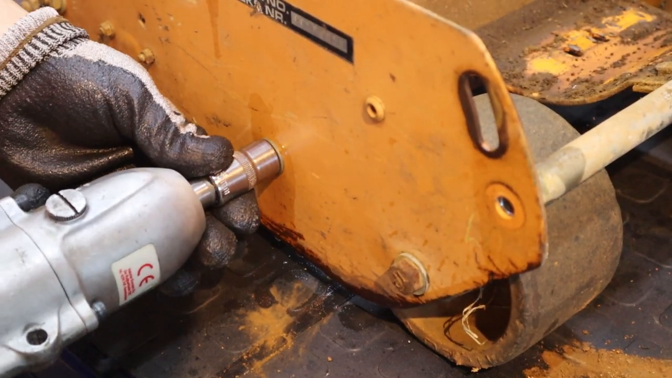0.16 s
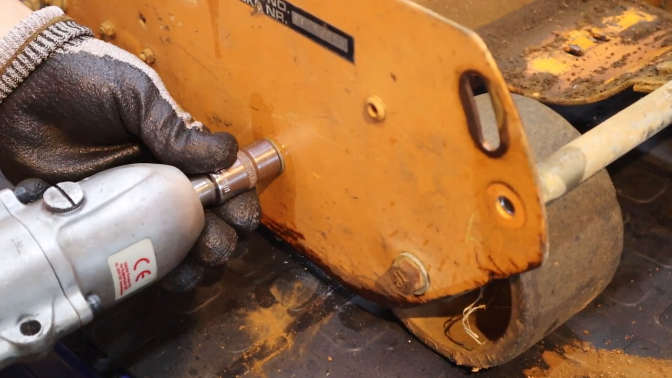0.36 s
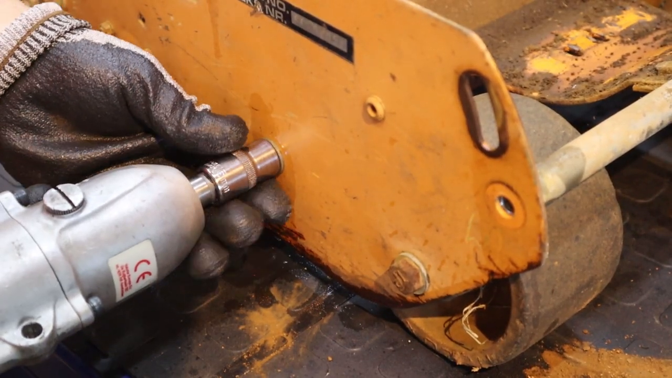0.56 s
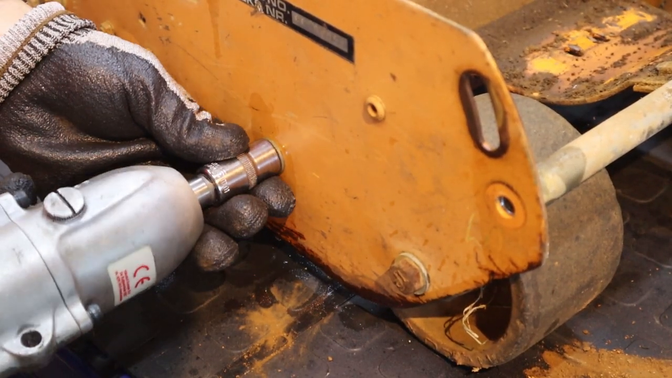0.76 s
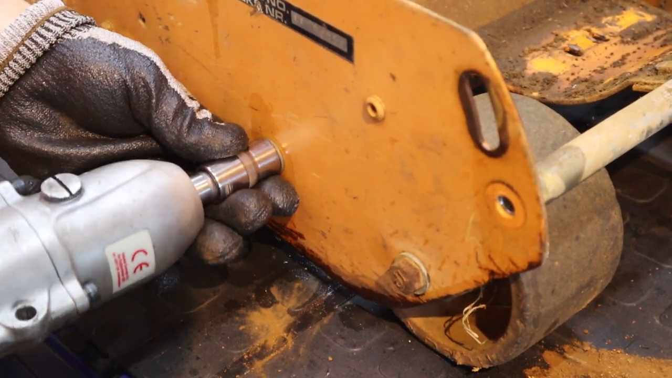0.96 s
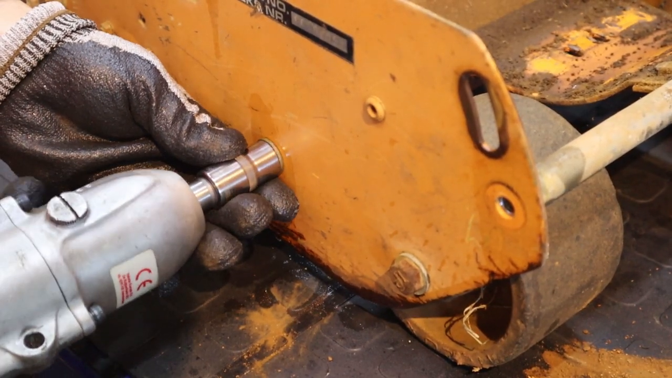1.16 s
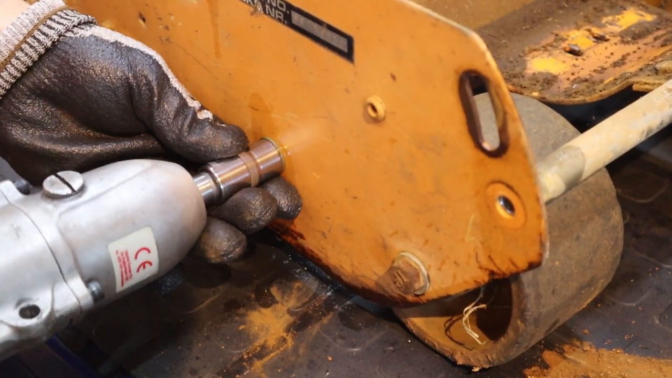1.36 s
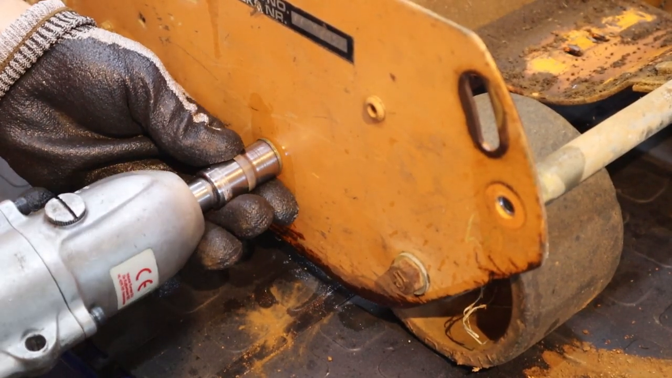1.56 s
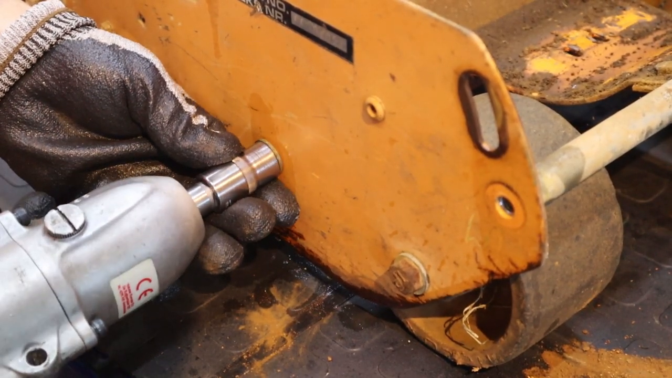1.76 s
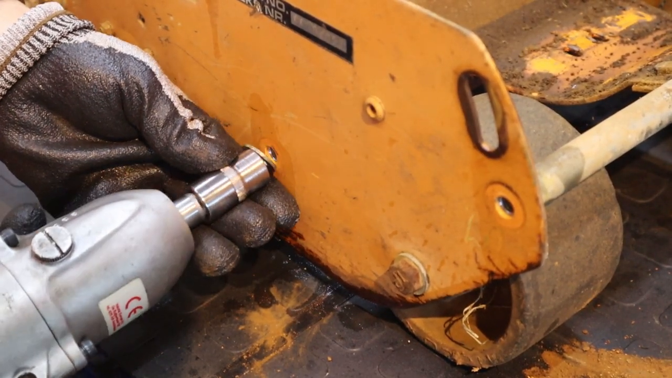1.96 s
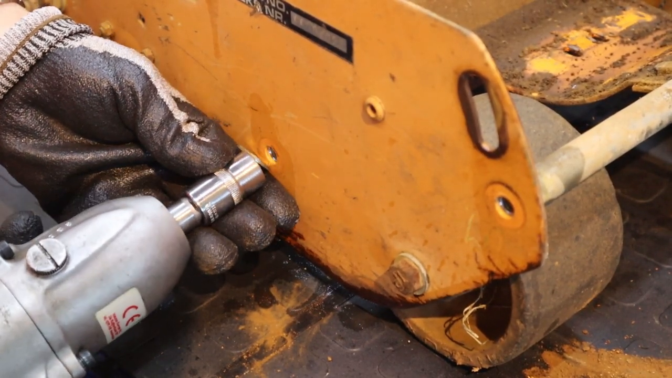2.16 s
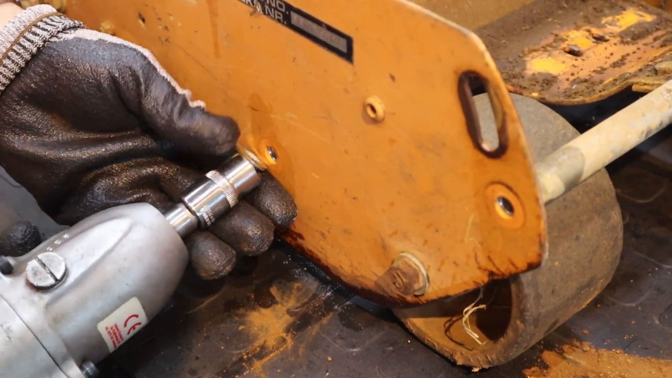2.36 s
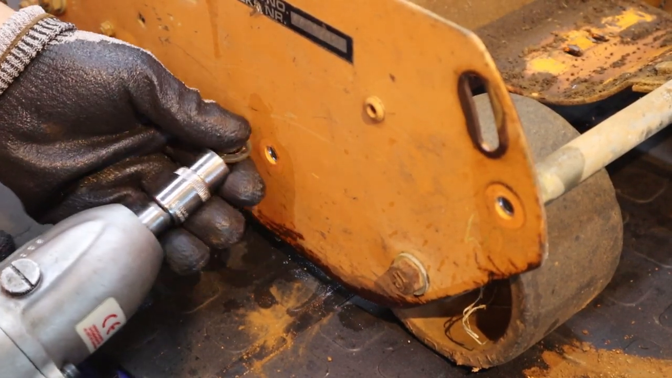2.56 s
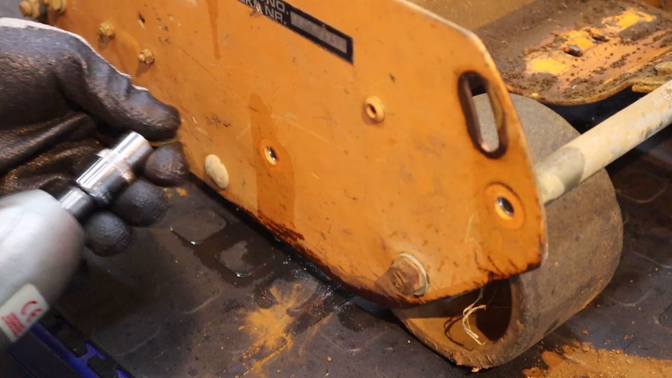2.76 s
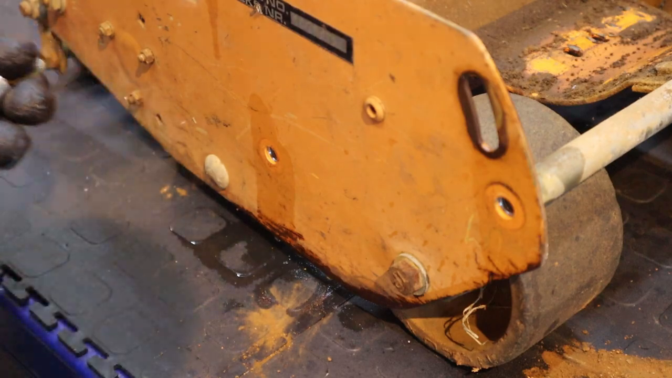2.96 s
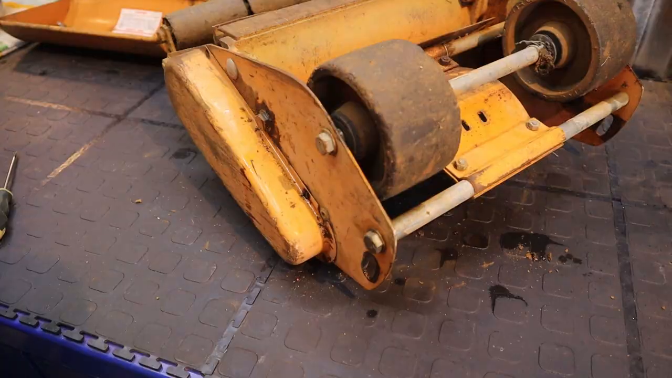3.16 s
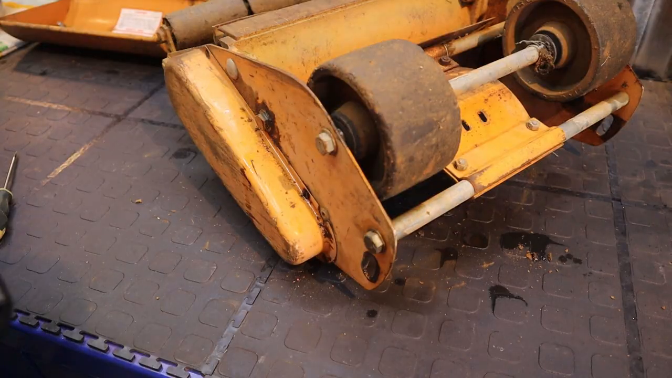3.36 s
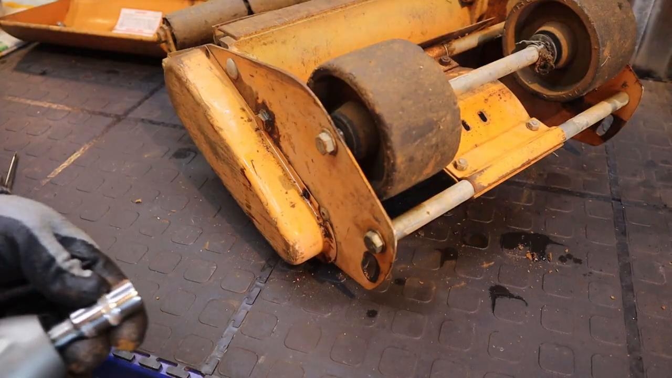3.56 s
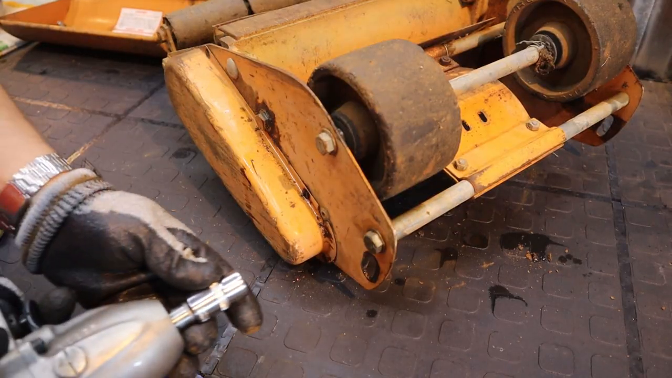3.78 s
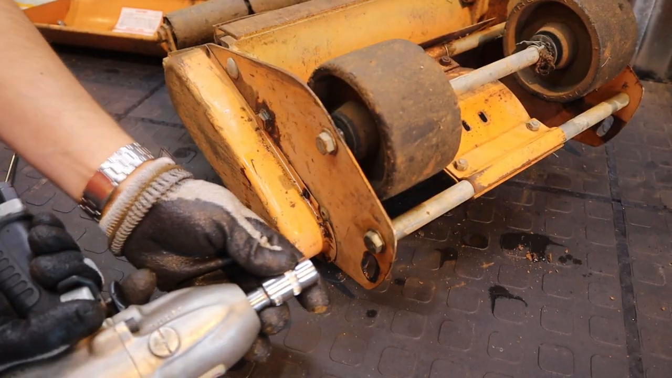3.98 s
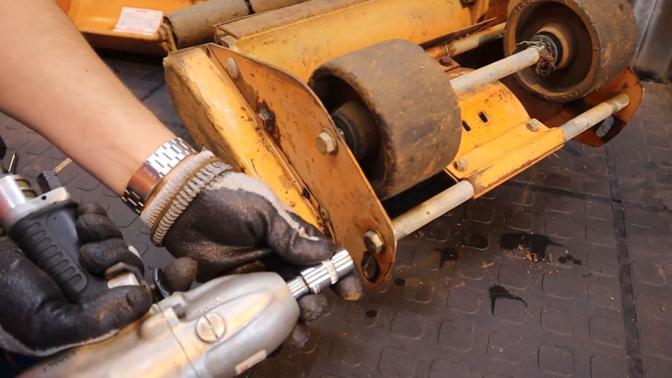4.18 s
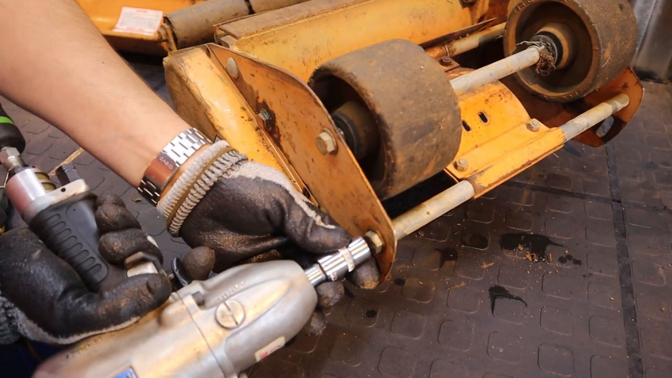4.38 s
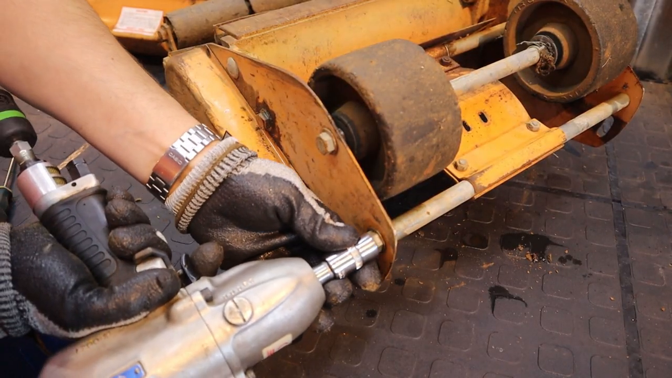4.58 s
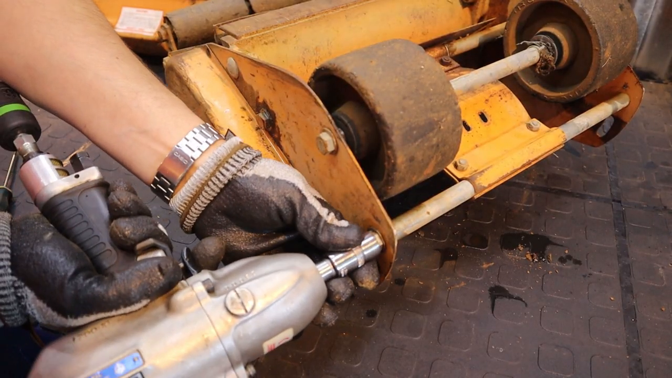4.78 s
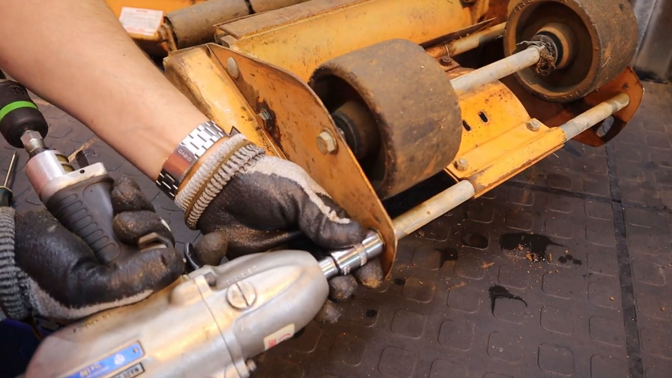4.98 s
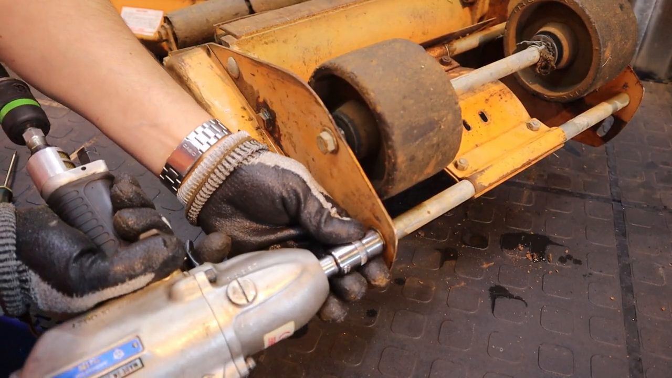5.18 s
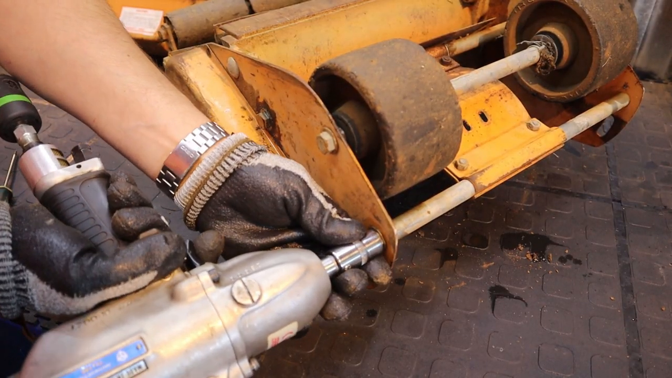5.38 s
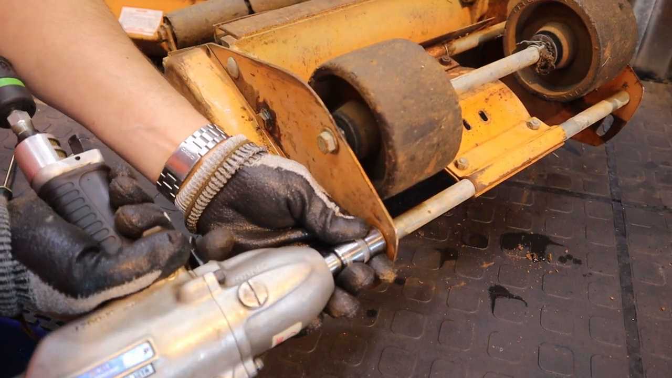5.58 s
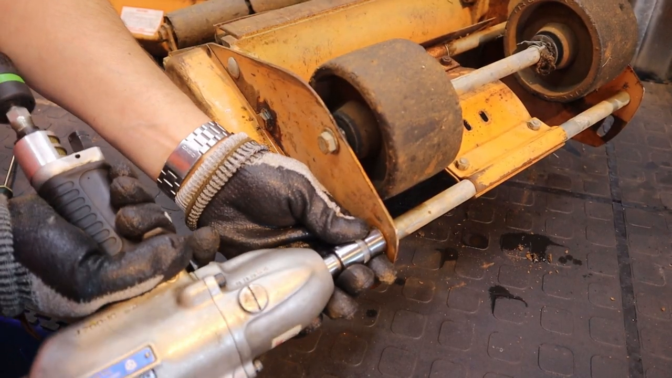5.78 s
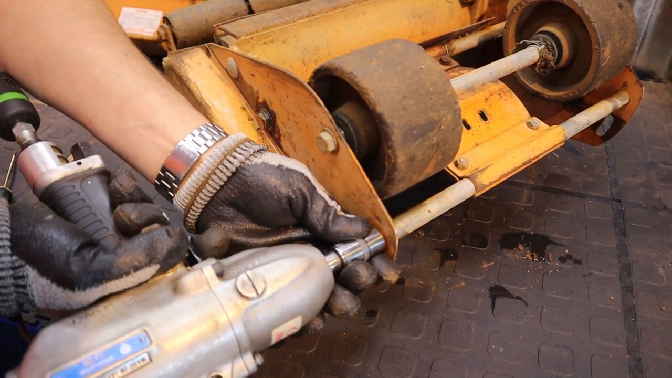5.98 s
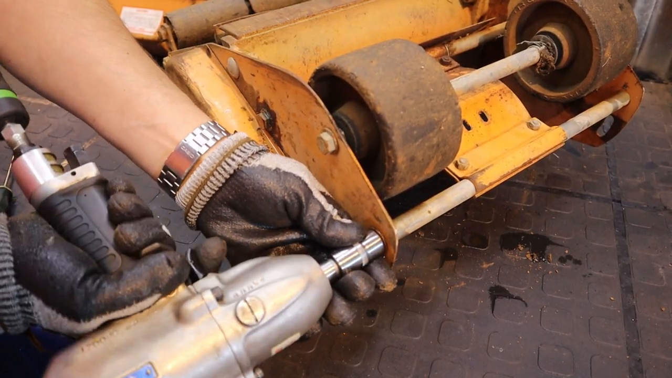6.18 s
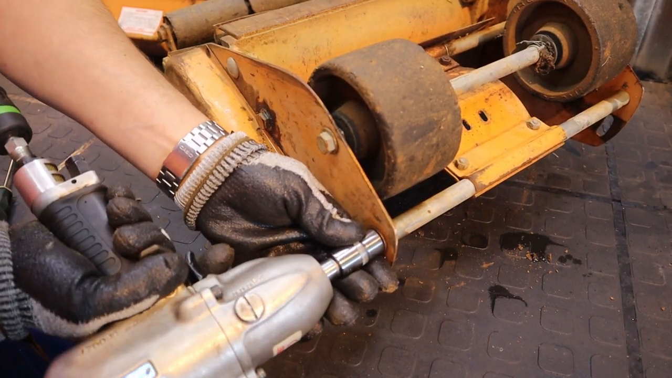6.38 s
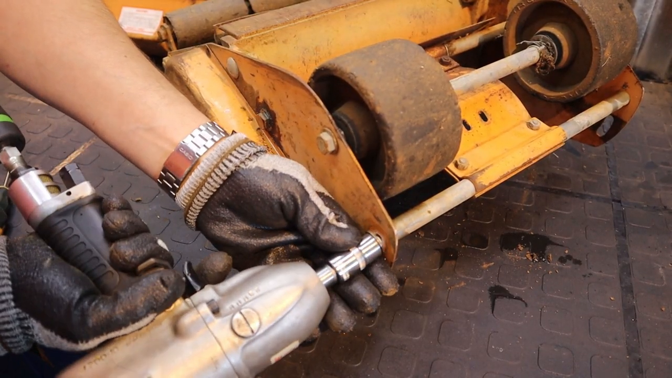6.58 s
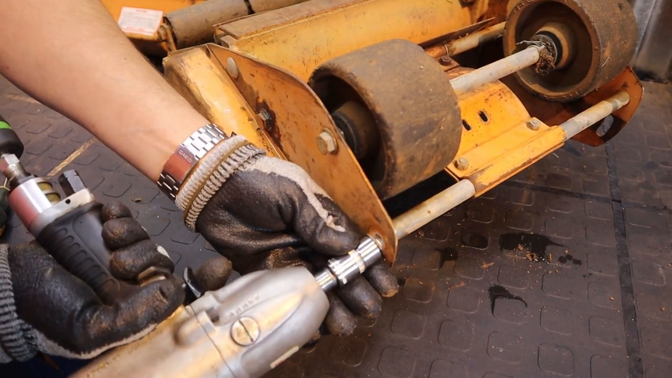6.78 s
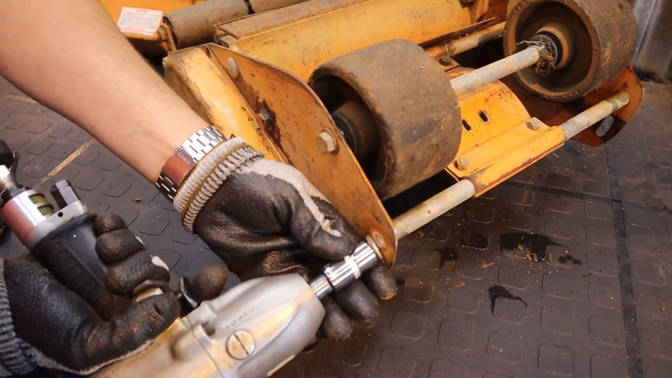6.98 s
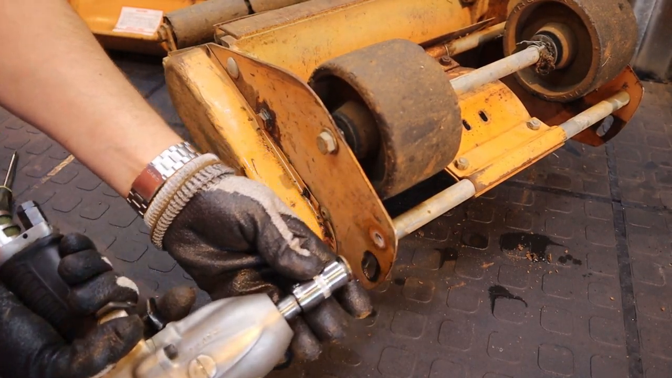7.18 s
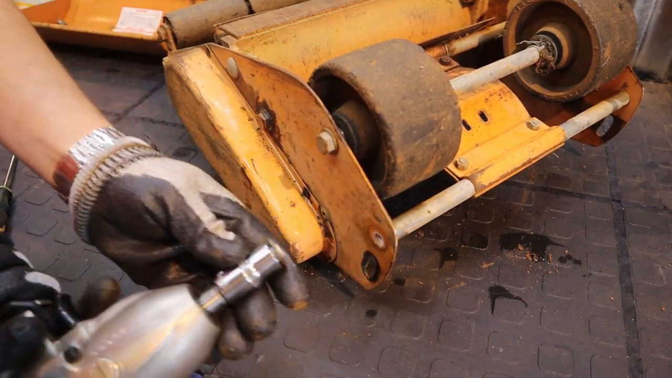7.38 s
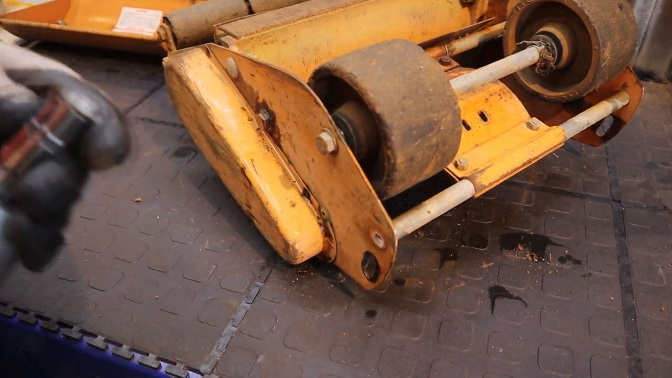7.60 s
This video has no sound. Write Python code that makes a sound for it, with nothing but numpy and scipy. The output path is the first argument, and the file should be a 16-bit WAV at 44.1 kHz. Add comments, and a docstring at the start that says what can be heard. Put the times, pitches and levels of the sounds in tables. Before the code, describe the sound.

Near, dry tool sounds with a short wall echo: metal clinks, a loud clattering burst of a pneumatic wrench, a smooth spinning burst, then loose socket rattles. After a near-silent gap the low room noise jumps to a different hum and small gliding bird notes are heard. A heavy dull knock seats the tool, then three brief hissing pulls with sharp steel blows wind down into faint hum.

```python
"""Air impact wrench in a workshop

An air wrench works in short pulls on bolts in a steel plate; a mains hum and rough noise lie behind it. Its
motor is a whine tied to the turning speed, with hiss and roar shaped from noise and ringing casing parts.
Hammer blows and socket clinks are noise cracks with ringing steel; dull knocks are low tones with a puff. At
3.13 s the scene changes, and another set of hum tones is heard; between the two jobs a bird sings outside in
gliding notes; a wall echo and the room's ring are added."""
import sys
import numpy as np
from scipy import signal
from scipy.fft import rfft, irfft
from scipy.io import wavfile
from scipy.ndimage import uniform_filter1d

SR = 44100
rng = np.random.default_rng(int(sys.argv[2]) if len(sys.argv) > 2 else 0)


def waveform_to_disk(signal):
    """Save audio, clipped to [-1, 1], as 16-bit WAV at the path in sys.argv[1]."""
    frames = np.transpose(np.atleast_2d(signal))
    scaled = np.clip(frames, -1, 1) * 32767
    samples = np.round(scaled).astype(np.int16)
    wavfile.write(sys.argv[1], SR, samples)


N = 336924  # length in samples


def gain_of(db):
    """Turns decibels into amplitude."""
    return 10 ** (np.asarray(db) / 20)


def evened(x):
    """Scales a sound to an rms of 1."""
    return x / np.sqrt(np.mean(x ** 2) + 1e-20)


def read(points, hz):
    """Reads a curve between its points, with frequency on a log axis."""
    f, value = np.transpose(points)
    return np.interp(np.log(hz + 1), np.log(f + 1), value)


def add(mix, s, sound):
    """Mixes a sound in at time s, in seconds."""
    part = mix[round(s * SR):][:len(sound)]
    part += sound[:len(part)]


def coloured(x, points):
    """Filters a sound by a curve of (f/Hz, level/dB) points."""
    hz = np.fft.rfftfreq(len(x), 1 / SR)
    return irfft(rfft(x) * gain_of(read(points, hz)), len(x))


def resonate(x, hz, width):
    """Rings at hz, with a gain of 1 at the peak: shift down to 0 Hz, smooth, shift back up."""
    turn = np.exp(2j * np.pi * np.cumsum(hz * np.ones(len(x))) / SR)
    r = np.exp(-np.pi * width / SR)
    return 2 * (turn * signal.lfilter([1 - r], [1, -r], x / turn)).real


def wander(size):
    """Smooth random curve with an rms of 1 that changes over about size samples."""
    return evened(uniform_filter1d(uniform_filter1d(rng.standard_normal(N), size), size))


def patchy(x, db):
    """Lets patches of the spectrum swell and sink at random, as turbulent flow does."""
    z = signal.stft(x, nperseg=256)[2]
    patches = rng.standard_normal(z.T.shape).T
    patches = evened(uniform_filter1d(uniform_filter1d(patches, 4, 0), 6, 1))
    return signal.istft(z * gain_of(db * patches), nperseg=256)[1][:N]


# how long the room rings in each band; columns: f/Hz, time to fall 60 dB/s
ROOM_RING = [(100, .5), (500, .5), (2000, .4), (6000, .28), (14000, .16)]


def room(x):
    """Many small reflections of random sign; each band dies away at its own speed."""
    taps = np.zeros(SR // 2)
    at = np.arange(300, len(taps) - 20, 20)
    taps[at + rng.integers(0, 20, len(at))] = rng.choice([-1., 1.], len(at))
    hz, t, z = signal.stft(taps, SR, nperseg=256)
    fade = gain_of(-60 * t / read(ROOM_RING, hz)[:, None])
    tail = signal.istft(z * fade, SR, nperseg=256)[1]
    return signal.fftconvolve(x, tail / np.linalg.norm(tail))[:N]


# level of the background noise and hum as heard: low after each burst, then creeping back
# columns: t/s, level/dB, treble boost of the noise/dB
BACKGROUND_LEVELS = [
    [(0.0, -52.5, -1), (0.206, -48, -4.5), (0.8, -54, 5.5)],
    [(1.95, -72, 9.5), (2.206, -63, 3.5), (3.12, -58, 5)],
    [(3.14, -51.5, 8), (3.35, -51.5, 3.5), (5.45, -51, 3)],
    [(6.92, -65.5, 2), (7.158, -59, -1), (7.64, -59.5, 4)],
]
# tone colour of the background noise; columns: f/Hz, relative level/dB
BACKGROUND_COLOUR = [(15, -33), (25, -15), (74, -0.5), (202, -2), (252, -4), (410, -7), (510, -6),
                     (706, -8), (809, -10.5), (1090, -9), (1550, -11), (2040, -19), (14400, -30.5),
                     (16500, -31)]
# hum lines before the cut; columns: f/Hz, relative level/dB
HUM_BEFORE_CUT = [(53.8, -78), (253.0, -73.5), (511.4, -67), (764.4, -74.5), (812.9, -70.5), (1017, -75.5),
                  (1222, -80.5), (1556, -77)]
# hum lines after the cut; columns: f/Hz, relative level/dB
HUM_AFTER_CUT = [(102.3, -66), (247.6, -61.5), (452.2, -58), (500.6, -63.5), (549.1, -67), (748.3, -67.5),
                 (850.6, -65.5), (1001, -63), (1249, -69.5)]
HUM_CUT_AT_S = 3.13  # from here on the second set of hum lines is heard


def hum_of(lines, noise, t):
    """Each hum line is a pure tone blurred by a narrow band of noise."""
    fuzz = .35
    tones = (gain_of(db) * (np.sin(2 * np.pi * f * t) + fuzz * evened(resonate(noise, f, 10)))
             for f, db in lines)
    return evened(sum(tones))


def background():
    """Patchy broad noise and fuzzy hum lines, heard louder and softer together."""
    s, db, treble_db = np.transpose(np.vstack(BACKGROUND_LEVELS))
    frames, hz, t = N // 256 + 5, np.fft.rfftfreq(1024, 1 / SR), np.arange(N) / SR
    a, b, patches = rng.standard_normal((frames, 513, 3)).T
    patches = evened(uniform_filter1d(uniform_filter1d(patches, 10, 0), 12, 1))
    # the treble boost sets in above 1500 Hz and is full from 3000 Hz
    treble_share = np.clip(np.log2(hz / 1500 + 1e-9), 0, 1)[:, None]
    tilt = treble_share * np.interp(np.arange(frames) * 256 / SR, s, treble_db)
    z = (a + 1j * b) * gain_of(read(BACKGROUND_COLOUR, hz)[:, None] + 1.5 * patches + tilt)
    air = signal.istft(z, nperseg=1024, noverlap=768)[1][:N]
    air /= np.sqrt(np.mean(air[t < 3] ** 2))
    noise = rng.standard_normal(N)
    before, after = hum_of(HUM_BEFORE_CUT, noise, t), hum_of(HUM_AFTER_CUT, noise, t)
    hum = np.where(t < HUM_CUT_AT_S, gain_of(-2.5) * before, gain_of(-5.0) * after)
    return gain_of(np.interp(t, s, db)) * (air + hum)


# bird notes; columns: start t/s, end t/s, first f/Hz, last f/Hz, relative level/dB
BIRD_NOTES = [(3.173, 3.265, 2050, 2520, -52), (3.245, 3.336, 3150, 2920, -51),
              (3.356, 3.458, 3030, 2940, -56), (3.53, 3.587, 3130, 2750, -52.5),
              (3.553, 3.627, 2740, 2745, -48), (3.685, 3.776, 2285, 2370, -51),
              (3.714, 3.777, 2850, 2940, -51), (3.731, 3.888, 3165, 3030, -53.5),
              (3.766, 3.847, 2675, 2680, -47.5), (3.948, 4.084, 4450, 4100, -52.5),
              (3.975, 4.107, 3890, 3710, -46.5), (4.056, 4.185, 3590, 3535, -48),
              (4.105, 4.24, 3850, 3610, -53.5), (4.308, 4.416, 3100, 2900, -57),
              (4.386, 4.46, 2060, 1950, -55), (4.487, 4.635, 4120, 3370, -51.5),
              (4.753, 4.828, 4570, 4000, -56), (4.796, 4.934, 3850, 3620, -47),
              (4.848, 4.943, 3990, 4000, -50.5), (4.854, 4.968, 3330, 3340, -50),
              (5.151, 5.227, 4200, 3190, -52), (5.2, 5.277, 3240, 3115, -47.5)]
FUZZ, FUZZ_PER_OCTAVE = .022, 0.13  # waver as a share of pitch; wide glides waver more


def bird():
    """Gliding notes, nearly pure tones, blurred by a quick waver of pitch."""
    out = np.zeros(N)
    waver, warble = wander(size=60), wander(size=200)
    for s, end, first_hz, last_hz, db in BIRD_NOTES:
        fuzz = FUZZ + FUZZ_PER_OCTAVE * abs(np.log2(last_hz / first_hz))
        at = np.arange(round(s * SR), round(end * SR))
        hz = np.geomspace(first_hz, last_hz, len(at)) * (1 + fuzz * waver[at])
        note = np.sin(2 * np.pi * np.cumsum(hz) / SR) * signal.windows.tukey(len(at), .4)
        add(out, s, gain_of(db - 2.0 + 1.5 * warble[at]) * note)
    return out


# dull knocks of the tool and of things set down; columns: t/s, level/dB, f/Hz
DULL_KNOCKS = [(0.2, -33.5, 118), (0.254, -21.5, 101), (0.426, -35.5, 353), (.559, -36.5, 350),
               (.673, -36, 350), (0.806, -13.5, 289), (0.808, -19, 137), (1.02, -10.5, 540),
               (1.057, -35.5, 113), (1.765, -32.5, 448), (1.868, -78, 222), (3.391, -33, 535),
               (4.214, -41, 136), (4.565, -5.5, 435), (4.584, -14.5, 404), (4.609, -26, 562),
               (4.62, -32, 105), (4.768, -23.5, 297), (4.818, -37.5, 40), (4.987, -34.5, 326),
               (5.389, -35.5, 341), (5.469, -25, 349), (5.487, -8.5, 319), (5.487, -17, 82),
               (5.773, -11.5, 246), (5.795, -24, 199), (5.83, -12, 283), (7.139, -56, 336),
               (7.405, -51.5, 337)]
KNOCK_CYCLES, KNOCK_LONGEST_S = 27, 0.41  # swings until 60 dB down, and the longest ring
# puff level of a -21 dB knock, dB of puff per dB of knock, shortest time for the puff to fall 60 dB
PUFF_DB, PUFF_GROWTH, PUFF_T60_S = -33.5, .5, 0.068


def knocks():
    """A low tone that dies away, with a puff of dull noise from scuffed rubber and dust."""
    out, t = np.zeros(N), np.arange(16000) / SR
    for s, db, hz in DULL_KNOCKS:
        t60 = min(KNOCK_CYCLES / hz, KNOCK_LONGEST_S)
        puff_db = PUFF_DB + PUFF_GROWTH * (db + 21) - db  # relative to the knock
        colour = [(hz / 4, -20), (hz, 0), (4 * hz, -8), (8 * hz, -30), (30 * hz, -75)]
        puff = evened(coloured(rng.standard_normal(len(t)), colour))
        puff *= gain_of(puff_db - 60 * t / max(t60, PUFF_T60_S))
        ring = 0.58 * np.sin(2 * np.pi * hz * t) * gain_of(-60 * t / max(t60, .01))
        onset = 1 - np.exp(-t * hz * 3)
        add(out, s, gain_of(db) * onset * (ring + puff))
    return out


# hammer on anvil; columns: t/s, level/dB, colour at 7 kHz/dB, share of motor speed kept
HAMMER_BLOWS = [(0.8146, -3, -14, 0.76), (0.8766, -5.5, -5.5, .7), (0.943, -10, -27.5, 1),
                (5.4911, -5, -9, .99), (5.5609, -9, -2.5, 0.43), (5.6403, -13, -18.5, 0.88),
                (5.8314, -11, -13.5, 0.98), (6.128, -12, -16.5, 0.94), (6.274, -6, -7.5, 0.98)]
HAMMER_T60_S, HAMMER_TOP_DB = 0.035, -13.5  # time for the crack to fall 60 dB; colour at 13 kHz
# socket clinks and rattles; columns: t/s, level/dB, time for the crack to fall 60 dB/s, colour at 7 kHz/dB
SOCKET_CLINKS = [(.0674, -23, 0.11, -12.5), (.1208, -31, .086, -15), (.1911, -22, 0.029, -12),
                 (.2046, -22.5, 0.13, -15), (.2117, -24, 0.047, -23), (.2562, -7, 0.076, -6),
                 (1.3686, -19.5, 0.14, 4), (1.4204, -13.5, 0.069, -3.5), (1.4529, -18, 0.2, -6.5),
                 (1.6406, -25.5, .033, -3), (1.704, -38, 0.023, 7), (1.7292, -30, 0.019, -8),
                 (1.7544, -32, .056, -10), (1.876, -54, 0.027, -16), (1.9008, -45, 0.098, -11),
                 (2.142, -43, 0.026, 0.5), (2.6487, -34, 0.037, -11), (4.053, -40.5, 0.038, -20.5),
                 (4.563, -22.5, 0.02, -20), (4.611, -31.5, 0.084, -16), (4.7736, -37, 0.095, -20),
                 (5.7702, -19, 0.043, -31), (6.4736, -21, 0.14, -25), (6.7565, -33.5, 0.047, -27),
                 (6.776, -33.5, 0.028, -15), (6.8094, -43, 0.055, -29.5), (7.5307, -51.5, 0.11, -7)]
CLINK_TOP_DB = -55
# thin dry ticks; columns: t/s, level/dB
DRY_TICKS = [(2.764, -53), (2.795, -50.5), (2.866, -49), (3.0164, -52)]
TICK_T60_S, TICK_HIGH_DB, TICK_TOP_DB = 0.04, -4.5, -3.0
# ringing tones of plate and socket; columns: f/Hz, relative level/dB, longest time to fall 60 dB/s
STEEL_TONES = [(795, -19, 0.22), (1131, -14.5, 0.11), (2404, -11, 0.024), (2530, -12, 0.036),
               (2890, -20.5, 0.12), (3790, -19, 0.057), (4720, -19, 0.13), (4810, -12.5, 0.087),
               (6800, -14, 0.12), (6100, -17, 0.12), (6180, -14, 0.35), (7400, -18.5, 0.23),
               (7640, -23.5, 0.098), (7830, -22.5, 0.23)]
RING_LASTS = 1.4  # the ring may outlast the crack by this factor


def blows():
    """A crack of noise and the steel ringing after it."""
    out, t = np.zeros(N), np.arange(8000) / SR
    rows = [(s, db, HAMMER_T60_S, high_db, HAMMER_TOP_DB) for s, db, high_db, _ in HAMMER_BLOWS]
    rows += [(*row, CLINK_TOP_DB) for row in SOCKET_CLINKS]
    rows += [(*row, TICK_T60_S, TICK_HIGH_DB, TICK_TOP_DB) for row in DRY_TICKS]
    for s, db, t60, high_db, top_db in rows:
        noise = rng.standard_normal(len(t))
        crack = noise * (gain_of(-60 * t / max(t60, .01)) + 0.39 * np.exp(-t / 0.00033))
        ring = np.zeros(len(t))
        # each blow excites the tones a little differently
        for (f, tone_db, longest), a, b in zip(STEEL_TONES, *rng.standard_normal((2, len(STEEL_TONES)))):
            fade_db = -60 * t / min(longest, RING_LASTS * t60)
            ring += gain_of(tone_db + 2.0 * a + fade_db) * np.sin(2 * np.pi * f * t + 3 * b)
        colour = [(200, -22.5), (900, 1), (3000, -3), (7000, high_db), (9000, high_db), (13000, top_db)]
        struck = crack + gain_of(-2) * ring
        add(out, s, gain_of(db) * coloured(struck, colour) * (t < .15))
    return out


# pulls of the trigger; columns: open t/s, shut t/s, squeeze time/s, free vane rate f/Hz,
# coasting lag at 1000 Hz/s, then relative levels: hiss/dB, roar/dB, whine/dB,
# coasting hiss/dB, coasting whine/dB, coasting roar/dB; last the share of air still held
TRIGGER_PULLS = [(.808, .927, .008, 925, .063, -21, -23, -20, -24, -24, -20, .45),
                 (1.049, 1.224, .08, 1860, .172, -18, -18, -20, -24, -26, -21, .02),
                 (5.491, 5.602, .015, 1070, .035, -21, -20, -20, -20, -30, -12, .02),
                 (5.83, 5.964, .024, 1790, .114, -16, -21, -18, -26, -18, -20, .15),
                 (6.117, 6.26, .04, 1740, .144, -17, -22, -19, -28, -19, -18, .02)]
SPIN_UP_S, VENT_S = .074, .032  # motor lag; fading of the air pressure after shutting
DRAG_HZ_PER_S, STALL_S = 383, .004  # dry friction; time scale of a stall
WINDAGE = .705  # the coasting lag shortens with speed to this power
LINGER_S, CUT_S = 0.018, 0.036  # the exhaust blows on after the trigger shuts, then cuts
HELD_S = .3  # a trigger that is not quite let go eases off over this time
CHOKE_DB, CHOKE_S = -8.5, .04  # a blow that halves the speed chokes the whine; recovery time
SPIT_T60_S = 0.059  # from rest, the valve spits as it opens; time to fall 60 dB


def motor():
    """Air follows the trigger; the rotor chases its free speed, coasts against friction, stalls at blows."""
    step = .0005  # s
    t = np.arange(0, N / SR + step, step)
    opens, shuts, squeeze, *rest, held = np.transpose(TRIGGER_PULLS)[:, :, None]
    trigger = np.clip((t - opens) / squeeze, 0, 1)
    air = (trigger * np.exp(-np.maximum(t - shuts, 0) / VENT_S)).max(axis=0)
    after = np.maximum(t - shuts - LINGER_S, 0)
    still_held = np.clip(held, 0, 1) * np.exp(-(after / HELD_S) ** 2)
    flow = (np.sqrt(trigger) * np.maximum(np.exp(-after / CUT_S), still_held)).max(axis=0)

    # the settings of the latest pull stay in force until the next one
    pull = np.maximum((t > opens).sum(axis=0) - 1, 0)
    free_hz, coast_s, *levels = (column[pull, 0] for column in rest)
    stall = sum(-np.log(np.clip(kept, .1, 1)) * np.exp(-((t - s) / STALL_S - 1) ** 2)
                for s, _, _, kept in HAMMER_BLOWS)
    stall = stall / (STALL_S * np.sqrt(np.pi))

    push = air * free_hz / SPIN_UP_S - (1 - air) * DRAG_HZ_PER_S
    loss = air / SPIN_UP_S + stall
    hz = np.zeros(len(t))  # vane rate
    for i in range(1, len(t)):
        windage = (1 - air[i]) / coast_s[i] * (hz[i - 1] / 1000) ** WINDAGE
        hz[i] = max(hz[i - 1] + step * (push[i] - (loss[i] + windage) * hz[i - 1]), 0)

    choke = signal.lfilter([step], [1, -np.exp(-step / CHOKE_S)], stall)
    choke_db = CHOKE_DB / np.log(2) * choke
    rested = np.interp(opens, t, hz) < 200
    spit = (rested * (t > opens) * gain_of(-60 * np.abs(t - opens) / SPIT_T60_S)).sum(axis=0)
    curves = (hz, flow, spit, choke_db, *levels)
    return [np.interp(np.arange(N) / SR, t, curve) for curve in curves]


# overtones of the whine; columns: multiple of the vane rate, relative level/dB
WHINE_OVERTONES = [(1, 0), (2, -10), (3, -12), (4, -16)]
# whine while air drives the motor; columns: vane rate f/Hz, relative level/dB
DRIVEN_WHINE = [(90, -37.5), (220, 5), (400, 1.5), (600, -2.5), (780, -2), (1000, -6.5), (1300, -2),
                (1520, -16)]
# whine while the motor runs down; columns: vane rate f/Hz, relative level/dB
COASTING_WHINE = [(60, -60), (200, -34), (330, -21), (520, -18), (750, -10), (920, 1), (1350, 1),
                  (1520, -8)]
# tone colour of the hiss; columns: f/Hz, relative level/dB
HISS_COLOUR = [(590, -50.5), (1000, -13), (1340, -9), (1660, -9.5), (4130, -10.5), (4590, -13),
               (4990, -13.5), (7170, -14), (8550, -8.5), (10700, -18), (11700, -11.5), (15900, -21.5),
               (16500, -55)]
# tone colour of the roar; columns: f/Hz, relative level/dB
ROAR_COLOUR = [(15, -53), (25, -13.5), (291, 4), (651, -5.5), (728, 4), (800, -18), (895, 3), (1190, -13),
               (1540, -6), (1760, -13.5), (2200, -8), (2860, -37.5), (4840, -120)]
# ringing tones of casing and plate; columns: f/Hz, width/Hz, level against the flow/dB
CASING_TONES = [(155, 15, 5), (308, 50, -1.5), (451, 7.3, 8), (602, 31, 9.5), (753, 12, 3), (1147, 24, 2),
                (1332, 29, 6), (1518, 40, 1), (2160, 53, -7), (2817, 38, 1), (3640, 40, 0.5), (3970, 30, 1),
                (5260, 45, -0.5), (6800, 94, 0.5), (8130, 150, -2.5), (11700, 200, 0.5), (12800, 130, 1.5)]
HISS_DB_PER_OCTAVE, ROAR_DB_PER_OCTAVE = 9.0, 9.5  # running down, counted from 1000 Hz
FLOW_DB_PER_OCTAVE = 1  # the driven hiss grows with speed
LABOUR_DB_PER_OCTAVE = -2  # the driven roar is stronger while the motor labours
BRIGHT_DRIVEN_DB, BRIGHT_COAST_DB = -1, -5.5  # treble of the hiss
SPIT_HISS_DB, SPIT_ROAR_DB = 2.4, 6.7  # spit above the pull's own levels
TAKE_UP_HZ = 240  # below this vane rate the rotor is too slow to pass much air


def wrench():
    """Vanes chop the air: a whine, hiss that puffs with each vane, a low roar and loose parts that tick."""
    (hz, open_, spit, choke_db, hiss_db, roar_db, whine_db,
     coast_hiss_db, coast_whine_db, coast_roar_db) = motor()
    driven = np.clip(2 * open_ - 1, 0, 1)  # a trickle of air does not drive the rotor
    octaves = np.log2(hz / 1000 + 1e-3)

    passing = open_ * np.minimum(hz / TAKE_UP_HZ, 1) ** 2
    hiss_gain = passing * gain_of(hiss_db + FLOW_DB_PER_OCTAVE * octaves)
    hiss_gain += spit * gain_of(hiss_db + SPIT_HISS_DB)
    hiss_gain += (1 - open_) * gain_of(coast_hiss_db + HISS_DB_PER_OCTAVE * octaves)
    roar_gain = passing * gain_of(roar_db + LABOUR_DB_PER_OCTAVE * np.maximum(octaves, -1.5))
    roar_gain += spit * gain_of(roar_db + SPIT_ROAR_DB)
    roar_gain += (1 - open_) * gain_of(coast_roar_db + ROAR_DB_PER_OCTAVE * octaves)
    driven_db = whine_db + choke_db + read(DRIVEN_WHINE, hz)
    coasting_db = coast_whine_db + read(COASTING_WHINE, hz)
    whine_gain = (hz > 0) * gain_of(driven * driven_db + (1 - driven) * coasting_db)

    turns = np.cumsum(hz * (1 + .015 * wander(size=60)) + 16 * wander(size=300)) / SR  # vanes passed
    whine = evened(sum(gain_of(db) * np.cos(2 * np.pi * k * turns) for k, db in WHINE_OVERTONES))
    whine *= gain_of(2.8 * wander(size=150))

    puffs = (0.76 + np.exp(-(turns % 1) / .3)) * rng.standard_normal(N)
    puffs *= gain_of(0.97 * wander(size=200))
    # loose parts tick at random, about 130 times a second; they stand out as the motor slows
    ticks = gain_of(4.5 * np.minimum(rng.exponential(1, N), 1.7)) * (rng.random(N) < 130 / SR)
    ticks = evened(coloured(ticks * rng.standard_normal(N), [(3000, -20), (8000, 0)]))
    tick_gain = gain_of(-10 + 4.0 * np.log2(700 / np.maximum(hz, 250)))
    air = evened(puffs) + tick_gain * ticks
    hiss = evened(patchy(coloured(air, HISS_COLOUR), 2.5))
    bright_db = BRIGHT_COAST_DB + (BRIGHT_DRIVEN_DB - BRIGHT_COAST_DB) * open_
    hiss = hiss + (gain_of(bright_db) - 1) * coloured(hiss, [(5000, -63.5), (7000, 2)])

    roar = evened(coloured(rng.standard_normal(N), ROAR_COLOUR)) * gain_of(3.2 * wander(size=300))
    # at high speed the puffs merge and the bottom of the roar thins out
    roar -= np.clip(hz / 1300, 0, .9) * coloured(roar, [(300, -1.5), (420, -40)])

    flow = gain_of(-3) * hiss_gain * hiss + gain_of(-8) * roar_gain * roar
    # the casing and the plate ring along with the flow
    rung = sum(gain_of(db) * resonate(flow, f, width) for f, width, db in CASING_TONES)
    return flow + rung + coloured(whine_gain * whine, [(2200, 1), (2900, -10.5), (4000, -12.0)])


ECHO_S, ECHO_DB = .062, -6  # far wall
ROOM_DB = -21  # near sources sent into the room's ring


def scene():
    """Near sources with a wall echo of the tool and the room; the bird is both direct and in the room."""
    tool, song = wrench(), bird()
    near = tool + blows() + knocks()
    echo = coloured(tool, [(500, -12.5), (900, -2.5), (1700, -2.5), (2600, -20.5)])
    add(near, ECHO_S, gain_of(ECHO_DB) * echo)
    reverb = room(gain_of(ROOM_DB) * near + 0.39 * song)
    return (near + 0.93 * song + reverb + background())[None]


EDGE_HZ = 16050  # little is left above this


def record(dry):
    """Rounds off loud peaks softly, then removes the highest treble."""
    soft = .75 * np.tanh(dry / .75)
    low_pass = signal.firwin(511, EDGE_HZ, window=("kaiser", 9), fs=SR)
    return signal.oaconvolve(soft, low_pass[None], "same")


dry = scene()
out = record(dry)
waveform_to_disk(out)
```